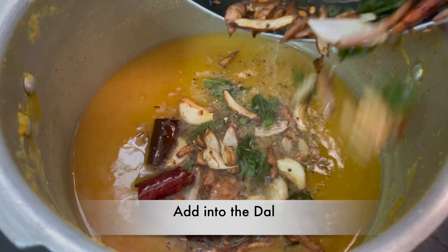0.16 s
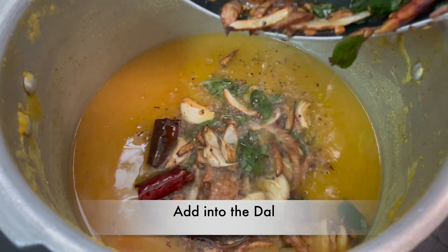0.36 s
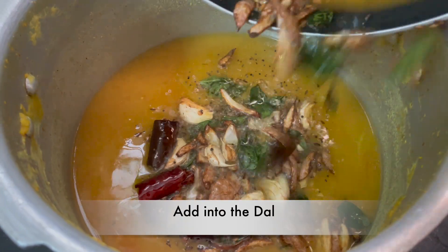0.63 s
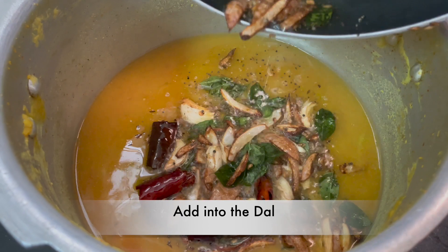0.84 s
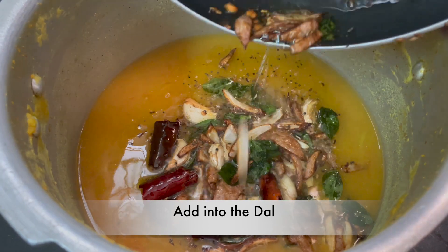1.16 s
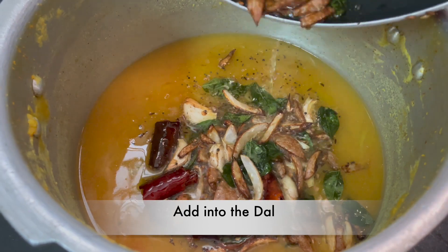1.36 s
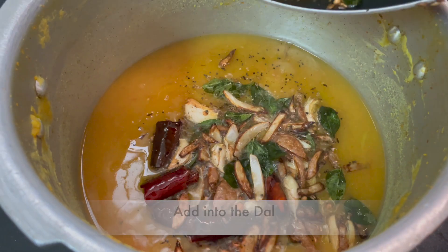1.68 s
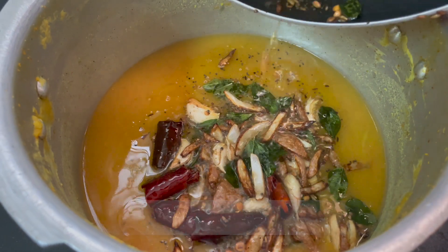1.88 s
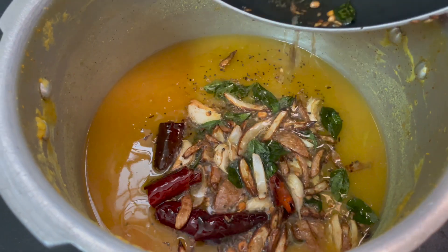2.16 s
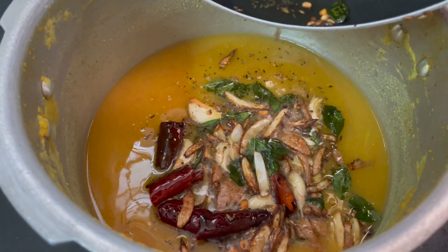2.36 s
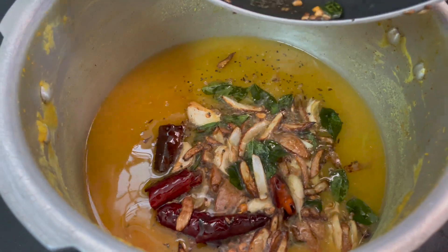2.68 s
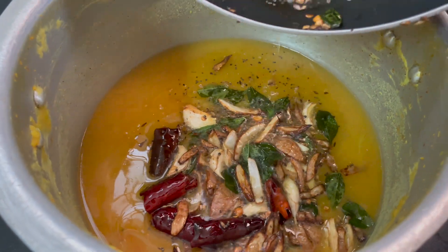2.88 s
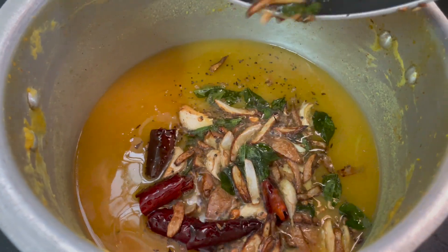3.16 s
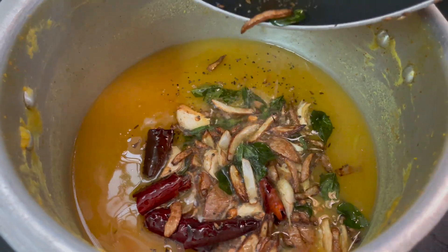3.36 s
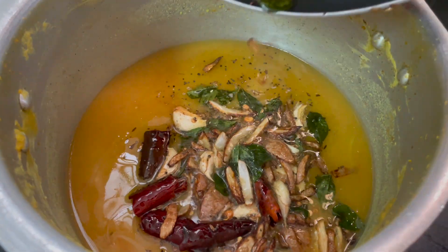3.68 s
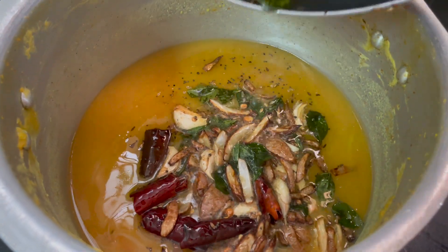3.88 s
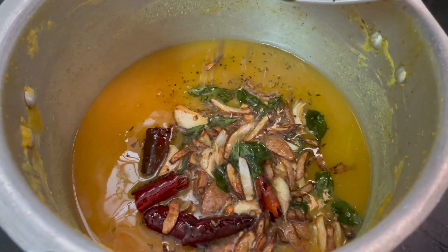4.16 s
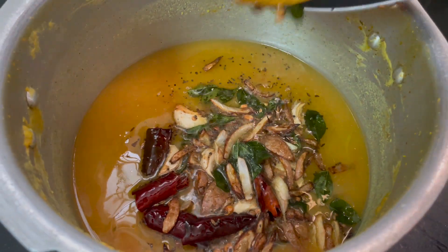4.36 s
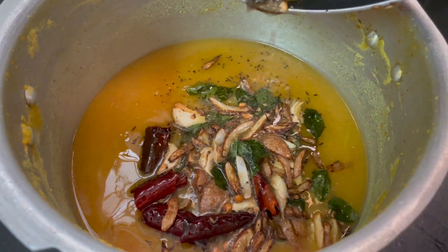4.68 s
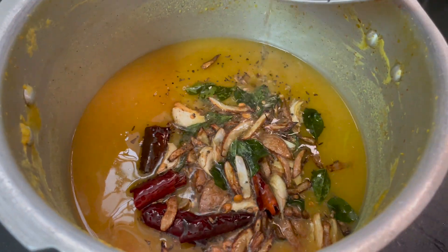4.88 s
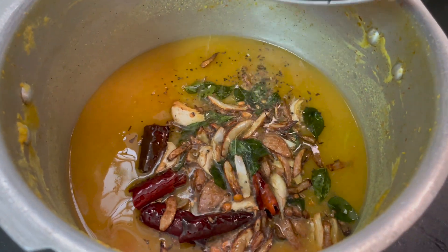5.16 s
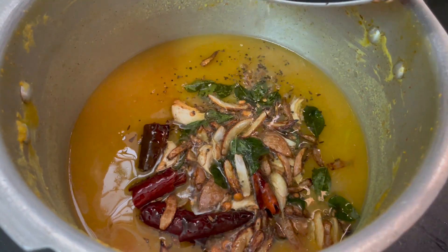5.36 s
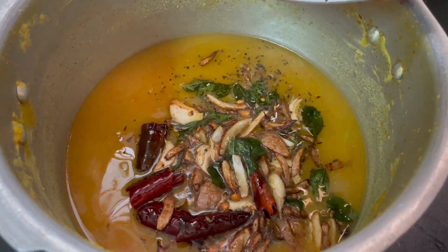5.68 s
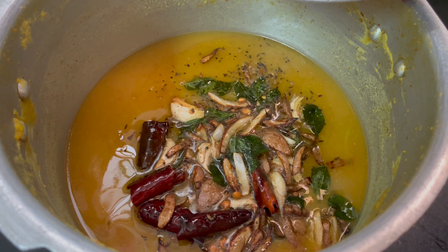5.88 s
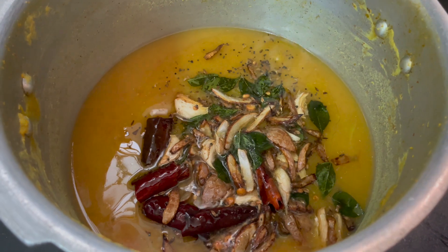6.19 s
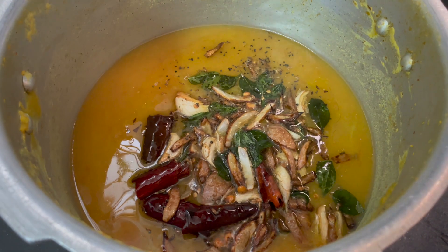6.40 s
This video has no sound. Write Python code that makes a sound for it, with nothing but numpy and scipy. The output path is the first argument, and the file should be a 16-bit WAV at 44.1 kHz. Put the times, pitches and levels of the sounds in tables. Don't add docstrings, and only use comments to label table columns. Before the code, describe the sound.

Hot oil and fried spices hit soup in a steel pot with a dense hissing sizzle, thinning to crackles as a spatula knocks a ringing pan.

```python
import sys
import numpy as np
from scipy import signal
from scipy.fft import rfft, irfft
from scipy.io import wavfile
from scipy.ndimage import uniform_filter1d, minimum_filter1d

SR = 44100
rng = np.random.default_rng(int(sys.argv[2]) if len(sys.argv) > 2 else 0)


def unload_audio(sound):
    columns = np.transpose(np.atleast_2d(sound))
    steps = np.round(np.clip(columns, -1, 1) * 32767)
    wavfile.write(sys.argv[1], SR, steps.astype(np.int16))


def volts_from_decibels(level):
    exponent = np.asarray(level, float) / 20
    return 10 ** exponent


N = 287973
TIME_S, FREQ_HZ = np.arange(N) / SR, np.arange(N // 2 + 1) * SR / N

# time in seconds, sizzle level in dB, bubble fineness in dB per octave.
BOIL = [(0.0, -21, -2), (0.3, -20.5, -2), (0.42, -23.5, 1.5), (0.8, -26, -1), (1.5, -29.5, -0.5),
        (1.56, -37, 0), (1.7, -32, 3), (2.1, -35.5, -0.5), (2.5, -35.5, -1.5), (2.9, -36.5, 1.5),
        (3.5, -33.5, 0.5), (4.15, -40, 1.5), (4.38, -37.5, 2), (4.75, -41.5, -0.5), (5.09, -33, 6.5),
        (5.4, -41.5, 5), (5.62, -41, -2.5), (5.85, -49.5, 10)]
# centre in Hz, level in dB.
FIZZ = [(2300, -10), (3200, 1.5), (4300, -3.5), (5800, -0.5), (8000, 7), (11000, 1.5), (15000, -3)]
# centre in Hz, width in Hz, level in dB.
POT_AIR = [(535, 142, 15.5), (700, 113, 2.5), (1172, 124, 11.5), (1781, 270, 3), (2280, 163, 11),
           (2813, 65, 2), (3065, 160, 2.5)]
# centre time in seconds, peak in dB, pitch in Hz, length in seconds.
GLUGS = [(.01, -16.5, 700, 0.003), (0.042, -24, 1196, 0.011), (0.063, -18, 1200, 0.011),
         (0.07, -28, 780, 0.014), (0.085, -26, 660, 0.014), (0.13, -27, 820, 0.013),
         (0.103, -24.5, 680, 0.023), (0.105, -22.5, 560, 0.0057), (0.146, -33, 2270, 0.018),
         (0.251, -25, 602, 0.0064), (0.6, -35, 1755, 0.036), (0.657, -31, 2460, 0.011),
         (1.095, -41, 1203, 0.027), (2.531, -26.5, 560, 0.013), (2.765, -31, 520, 0.015),
         (3.67, -32.5, 1210, 0.013)]
# frequency in Hz,
# density in dB per Hz.
KITCHEN = [(15, -48), (25, -2.5), (179, 5.5), (261, -3.5), (519, -15), (718, -23), (852, -25), (1200, 1),
           (1500, -29), (1950, -17), (3300, -120)]
# start in seconds, ring level in dB, then nearness
# to the base, to the rim and to the handle in dB.
PAN_BLOWS = [(0.3, -45, 0, 0, 3), (0.827, -26.5, -10, 5.5, -1), (0.97, -47.5, 8, 12.5, 2),
             (1.217, -23.5, -6.5, -0.5, -2), (1.342, -21.5, -9, -14, -22), (1.469, -44.5, 2, 7.5, 5),
             (1.917, -22, -19, -7, -6), (2.527, -38, 2.5, -9, -6), (3.26, -17.5, -10, -16, -1),
             (3.85, -17.5, -17.5, -4.5, -6.5), (4.181, -43, 1, -15, 3), (4.568, -14, -11, -9, -21),
             (4.806, -37.5, 3, -18, 9.5), (5.182, -13.5, -11, -10, -14), (5.527, -12, -10.5, -11, -18)]
# frequency in Hz, level in dB, T60 in seconds.
PAN_MODES = [
    [(484, -15.5, 0.47), (600, -3.5, 0.27), (720, -4.5, .17), (1617, -10, 0.25), (880, -37, 0.13),
     (1172, -13.5, 0.4)],
    [(1041, -1.5, .17), (1300, -9, .11), (1440, -10, .1)],
    [(2176, -5.5, 0.17), (2200, -9, .05), (2820, -13, 0.13), (1900, -4.5, 0.022), (3370, -16, 0.054),
     (3570, -54, .15)],
    [(2488, -6, 0.19), (2443, -6.5, 0.11), (2640, -22, 0.074), (4270, -71, 0.14), (5130, -5.5, 0.046),
     (5500, -28, .06)],
]
# start in seconds, body level in dB, weight in dB, hardness in dB,
# tick in dB; the last three are relative to the body.
KNOCKS = [(0.302, -15.5, -10, -7, -5), (0.827, -13.5, -45, -7, 1.5), (1.217, -16, -30, -4, 7),
          (1.342, -18, -28, -17, -10), (1.916, -24.5, -6.5, -13, 12), (2.527, -26, -4, -4, -1),
          (3.259, -12.5, -15, 4, 4), (3.85, -17.5, -21, -6, 7), (4.182, -23, 0.5, 0, -9),
          (4.567, -18, 4.5, -19, -2), (4.806, -16, -0.5, 5.5, 6), (5.182, -14.5, 2.5, -5, -1),
          (5.527, -14, 5.5, -8, 1)]
# centre in Hz, width in Hz, T60 in seconds.
KNOCK_BANDS = [
    (434, 540, 0.15),
    (795, 407, 0.048),
    (1350, 1260, 0.044),
    (2610, 1660, 0.043),
]
# start in seconds, peak in dB, pitch in octaves over the thud.
DROPS = [(1.568, -22, 3.05), (1.648, -29, 0.42), (2.047, -28, 2.1), (2.55, -35, 0.43), (2.764, -29.5, 0.38),
         (2.785, -29.5, .4), (2.84, -28.5, 0.54), (2.901, -33, .4), (3.65, -32, 0.43), (3.671, -41, 1.5),
         (3.393, -29, 1.7), (3.632, -26.5, 1.45), (3.721, -32, 2.2), (3.795, -28, 2.2), (4.213, -35, 0.91),
         (4.439, -28.5, 2.1), (4.036, -36, .3), (4.675, -26, 2.94), (4.94, -31, 1.9), (4.999, -27, 3),
         (5.306, -26.5, 1.8), (5.757, -21.5, 2.28), (6.118, -31, 2.1), (6.153, -24, 2.2),
         (6.236, -34.5, 3.2), (6.358, -33, 2.4), (6.437, -33.5, 2.8)]
# start in seconds, peak in dB, centre in Hz.
SPITS = [(2.0343, -20, 7020), (2.2126, -13, 11500), (2.276, -17.5, 4100), (2.4748, -22.5, 5570),
         (2.697, -18, 11300), (2.7482, -14, 11500), (2.8834, -13, 10800), (2.9592, -15, 6560),
         (3.01, -17, 11430), (3.0545, -17, 9950), (3.1484, -20, 7200), (3.2091, -16.5, 7560),
         (3.239, -14, 10340), (3.3945, -14.5, 11700), (3.6304, -11.5, 11700), (3.738, -18, 5700),
         (4.0083, -22, 5300), (4.126, -21, 6700), (4.2464, -14.5, 6740), (4.44, -16.5, 4790),
         (4.484, -14.5, 7140), (4.5553, -22, 11900), (3.7618, -21, 5560), (4.8844, -16.5, 12400),
         (5.113, -24, 5600), (5.4876, -17, 11500), (5.5194, -12.5, 10200), (1.5675, -20, 7800),
         (2.385, -16, 7900), (5.0624, -13.5, 9850)]
# start in seconds, peak in dB, centre in Hz.
LAST_SPITS = [(5.6352, -25.5, 10900), (5.6628, -31, 4690), (5.7164, -24, 11200), (5.823, -28, 9400),
              (5.8731, -28, 7300), (5.9564, -33, 11300), (6.0245, -30.5, 6800), (6.134, -28, 12100),
              (6.1677, -32, 4480), (6.2123, -29, 5580), (6.238, -31, 4640), (6.2594, -41, 12100),
              (6.3355, -36, 5530), (6.3953, -25.5, 11300), (6.4373, -31, 6400), (6.4577, -29, 11300),
              (6.5116, -26.5, 6480)]
# frequency in Hz, level relative to the direct sound in dB.
WALL_ECHO = [(100, 11), (350, -13), (700, -5.5), (1500, -2), (4500, -1.5), (7000, -13), (16000, -8.5)]
# frequency in Hz, left minus right in dB.
PORT_PAN = [(100, -2), (500, 1), (1500, 2), (3000, 3.5), (5000, 4.5), (8000, -2.6), (16000, 4.5)]
# frequency in Hz, lead of the right port in cycles.
PORT_TURNS = [(0, 0), (5400, 0), (8250, .5), (11600, 1), (14950, 1.5), (22050, 2.5)]
# frequency in Hz, level under the other that is dropped in dB.
JOINT_DROP = [(4000, -30), (5500, -11), (8200, -8), (10500, -4.5), (14500, -4.5), (16000, -2.5)]


def on_hz(table):
    hz, value = np.transpose(table)
    return np.interp(np.log(FREQ_HZ + 1), np.log(hz), value)


def unit(x):
    return x / np.sqrt(np.mean(x ** 2))


def band(x, hz, width_hz):
    return signal.lfilter(*signal.iirpeak(hz, hz / width_hz, fs=SR), x)


def highpass(x, hz):
    return signal.sosfilt(signal.butter(2, hz, "high", fs=SR, output="sos"), x)


def decay(t_s, t60_s):
    return np.exp(-np.log(1000) * t_s / t60_s)


def strikes(start_s, level_db):
    at = np.clip(np.asarray(start_s) * SR, 0, N - 1).astype(int)
    return np.bincount(at, volts_from_decibels(level_db), N)


def walk(rate_hz):
    hold = int(SR / rate_hz)
    levels = rng.standard_normal(size=400)[:N // hold + 1]
    slewed = uniform_filter1d(np.repeat(levels, hold), hold)
    return 0.77 * uniform_filter1d(slewed, hold)[:N]


def bursts(rate_hz, scatter_db):
    when, size, sign = rng.random(N), rng.exponential(size=N), rng.standard_normal(N)
    click = volts_from_decibels(scatter_db * np.minimum(size, 5.2)) * sign
    return (when < rate_hz / SR) * click / np.sqrt(rate_hz)


def heard(x, t60_s=0.053, wet_db=1.8):
    t_s = np.arange(8192) / SR
    echo = rng.standard_normal((2, 8192)) * decay(t_s, t60_s) * (t_s > .0004)
    echo /= np.sqrt(np.sum(echo ** 2, axis=1, keepdims=True))
    return irfft(rfft(x) * (1 + volts_from_decibels(on_hz(WALL_ECHO) + wet_db) * rfft(echo, N)), N)


def heat_db(t_s):
    at_s, level_db, _ = np.transpose(BOIL)
    cooling_db_per_s = -3
    return np.interp(t_s, at_s, level_db) + cooling_db_per_s * np.maximum(t_s - at_s[-1], 0)


def boil(surge_db):
    fizz_db = heat_db(TIME_S)
    fineness_db = np.interp(TIME_S, *np.transpose(BOIL)[::2])
    steady_s = 3.5
    patch_db = (surge_db + 3.24 * walk(22)) * (1 - 0.2 * np.exp(-TIME_S / steady_s))
    rate_hz = 2500 * volts_from_decibels(.75 * (fizz_db + 23.5))
    scatter_db = 2.5 - 0.039 * (fizz_db + 24)

    wide = unit(bursts(.6 * rate_hz, scatter_db))
    fizz = 0
    for hz, level_db in FIZZ:
        clicks = unit(bursts(rate_hz, scatter_db + 0.45)) + 0.38 * wide
        tilt_db = fineness_db * np.log2(hz / 8000)
        tone = band(band(clicks, hz, 0.69 * hz), hz, 0.69 * hz)
        fizz = fizz + volts_from_decibels(level_db + tilt_db + 2.2 * walk(24.92)) * tone

    plops = unit(bursts(.5 * rate_hz, scatter_db + 0.14)) + 0.37 * wide
    air = 0
    for hz, width_hz, level_db in POT_AIR:
        air = air + volts_from_decibels(level_db + 2.0 * walk(12)) * band(plops, hz, width_hz) / np.sqrt(width_hz)
    air = highpass(air, 380)
    pour_db, pour_s = 8.5, 0.14
    stir_db, stir_s = 3, 0.1
    blows = strikes(*np.transpose(KNOCKS)[:2]) * volts_from_decibels(12.5)
    stirred = signal.lfilter([1], [1, -np.exp(-1 / (stir_s * SR))], blows)
    air_db = -33 + 0.63 * (fizz_db + 22)
    air_db = air_db + pour_db * np.exp(-TIME_S / pour_s) + stir_db * stirred
    return unit(fizz) * volts_from_decibels(fizz_db + patch_db - 3.5) + unit(air) * volts_from_decibels(air_db + 0.15 * patch_db - 5.0)


def splash():
    churn = unit(band(rng.standard_normal(N), 134, 120))
    level_db, fade_s = -47.5, 0.45
    return volts_from_decibels(level_db + 2.6 * walk(6)) * np.exp(-TIME_S / fade_s) * churn


def kitchen():
    shape = volts_from_decibels(on_hz(KITCHEN))
    mid, side = (unit(irfft(rfft(rng.standard_normal(N)) * shape, N)) for _ in range(2))
    level_db = -52.5 + 0.72 * walk(3.17)
    return volts_from_decibels(level_db) * (mid + 0.16 * side * np.array([[1], [-1]]))


def glugs():
    out = 0
    for at_s, peak_db, hz, length_s in GLUGS:
        swell = np.exp(-(2 * (TIME_S - at_s) / length_s) ** 2)
        out = out + volts_from_decibels(peak_db) * swell * np.sin(2 * np.pi * hz * TIME_S)
    return out


def pan():
    start_s, ring_db, base_db, rim_db, handle_db = np.transpose(PAN_BLOWS)
    families_db = ring_db + base_db, ring_db + rim_db, ring_db, ring_db + handle_db
    out = 0
    for family_db, modes in zip(families_db, PAN_MODES):
        for hz, level_db, t60_s in modes:
            pole = np.exp(2j * np.pi * hz / SR - np.log(1000) / (t60_s * SR))
            hit = strikes(start_s, family_db + level_db + 4.5)
            out = out + signal.lfilter([1], [1, -pole], hit).imag
    return out


def contacts():
    gap_db = -11
    drop_db_per_octave = 8.5
    rows = []
    for start_s, body_db, weight_db, hard_db, _ in KNOCKS:
        knock_db = body_db + hard_db / 2 + gap_db
        rows.append((start_s, body_db + weight_db, body_db, knock_db, body_db + hard_db))
    octaves = np.log2([hz / KNOCK_BANDS[0][0] for hz, *_ in KNOCK_BANDS])
    for start_s, peak_db, pitch in DROPS:
        rows.append((start_s, *(peak_db - drop_db_per_octave * np.abs(octaves - pitch))))
    return rows


def knocks():
    out, t_s = np.zeros(N + 4096), np.arange(4096) / SR
    rows = contacts()
    for (start_s, *parts_db), rattle in zip(rows, rng.standard_normal((len(rows), 4096))):
        for part_db, (hz, width_hz, t60_s) in zip(parts_db, KNOCK_BANDS):
            push = 8 * np.exp(-((t_s - .0004 - 400 / hz ** 2) / .0001) ** 2)
            contact = (1 - np.exp(-t_s / 0.0019)) * decay(t_s, t60_s)
            shake = band(band(push + rattle * contact, hz, width_hz), hz, 1.16 * width_hz)
            out[int(start_s * SR):][:4096] += volts_from_decibels(part_db + 4.0) * shake / np.abs(shake).max()
    return out[:N]


def spits():
    small_count, small_from_s = 70, 1.6
    when, size, pitch = rng.random((small_count, 3)).T
    small_s = small_from_s + when ** .7 * (LAST_SPITS[0][0] - small_from_s)
    small_db = heat_db(small_s) + 17 + 6.5 * np.log(size)
    small_hz = 3080 * 2 ** (2.7 * pitch)
    last = [(s, db + 4, hz) for s, db, hz in LAST_SPITS]
    ticks = [(s + 0.000963, db + tick_db, 3350) for s, db, *_, tick_db in KNOCKS]
    rows = SPITS + last + ticks + list(zip(small_s, small_db, small_hz))

    out, t_s = np.zeros(N + 512), np.arange(512) / SR
    rise_s, fall_s = .0008, 0.0022
    shape = (1 - np.exp(-t_s / rise_s)) * np.exp(-t_s / fall_s)
    for (start_s, peak_db, hz), hiss in zip(rows, rng.standard_normal((len(rows), 512))):
        centre_hz = min(hz, 14000)
        crack = band(hiss * shape, centre_hz, 0.59 * centre_hz)
        out[int(start_s * SR):][:512] += volts_from_decibels(peak_db - 2) * crack / np.abs(crack).max()
    return out[:N]


def scene():
    surge_db = 0.84 * walk(7)
    soup = sum(heard(boil(surge_db)) for _ in range(3))
    soup = soup + heard(spits() + glugs(), t60_s=0.031, wet_db=2.0)
    ring = heard(uniform_filter1d(pan(), size=4), t60_s=.03, wet_db=-9)
    hits = heard(knocks(), t60_s=0.19, wet_db=2.5) + ring
    hits = highpass(hits, 140)
    hits = np.roll(hits, int(.001 * SR), axis=1) * volts_from_decibels(np.array([[.6], [-.6]]))
    return soup + hits + kitchen() + splash()


def joint_stereo(x):
    hz, at_s, both = signal.stft([x[0] + x[1], x[0] - x[1]], SR, nperseg=2048)
    power = uniform_filter1d(np.abs(both) ** 2, size=20, axis=1)
    margin = volts_from_decibels(2 * np.interp(hz, *np.transpose(JOINT_DROP)))[:, None]
    treble = np.sum(np.diff(x, prepend=0) ** 2, axis=0)
    crest = uniform_filter1d(treble, size=128) / uniform_filter1d(treble, size=2048)
    peak_crest = -minimum_filter1d(-crest, size=1024)
    click_db = 4.7
    clicky = peak_crest[np.minimum(at_s * SR, N - 1).astype(int)] > volts_from_decibels(2 * click_db)
    keep = clicky | (power > margin * power[::-1])
    mid, side = signal.istft(both * keep, SR, nperseg=2048)[1][:, :N]
    return np.array([mid + side, mid - side]) / 2


def band_limit(x):
    return signal.sosfilt(signal.butter(12, 16500, fs=SR, output="sos"), x)


def record(dry):
    pan_db = on_hz(PORT_PAN)
    turns = np.interp(FREQ_HZ, *np.transpose(PORT_TURNS))
    bass_cut = FREQ_HZ ** 2 / (FREQ_HZ ** 2 + 40 ** 2)
    left = volts_from_decibels(pan_db / 2)
    right = volts_from_decibels(-pan_db / 2) * np.exp(2j * np.pi * turns)
    ports = irfft(rfft(dry) * bass_cut * np.array([left, right]), N)
    limit = 1.15
    rounded = limit * np.tanh(ports / limit)
    top = signal.ellip(10, .2, 70, 15900, fs=SR, output="sos")
    mix = joint_stereo(signal.sosfilt(top, rounded))
    return band_limit(mix)


dry = scene()
out = record(dry)
unload_audio(out)
```